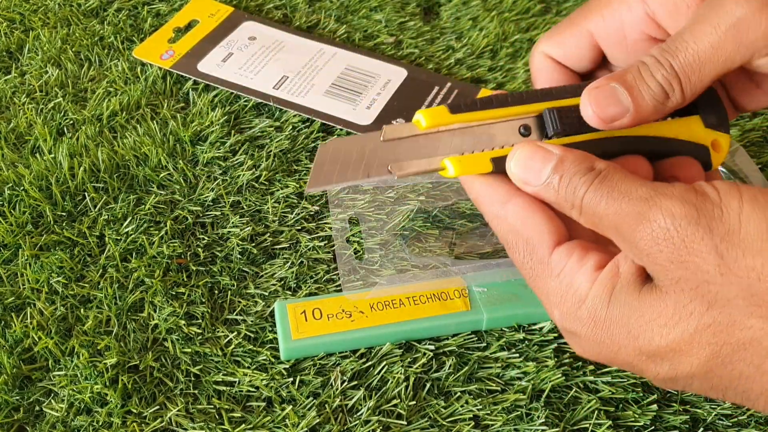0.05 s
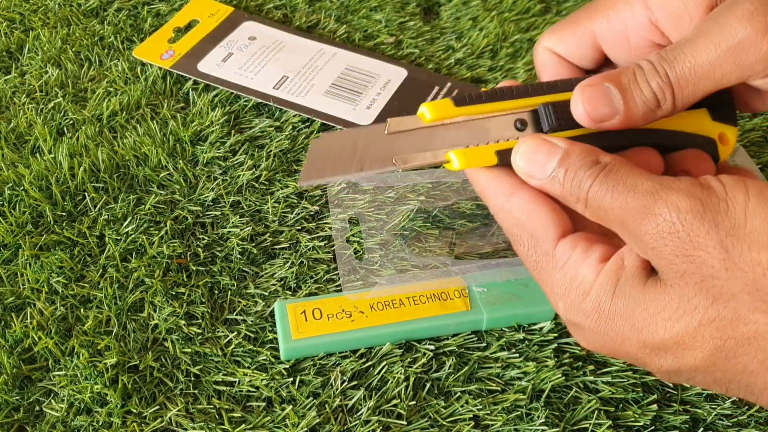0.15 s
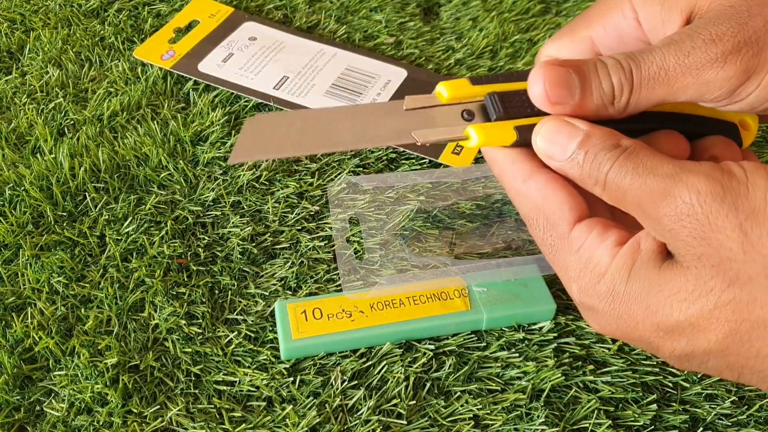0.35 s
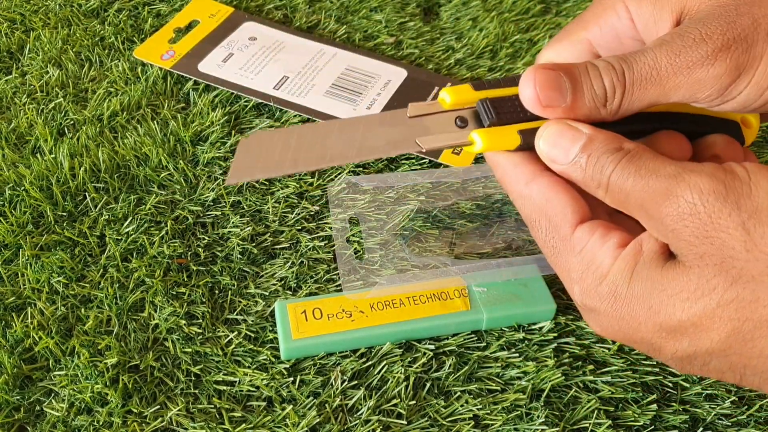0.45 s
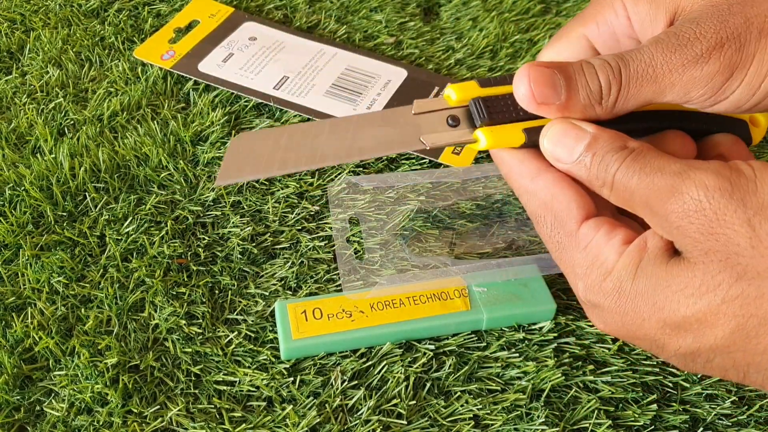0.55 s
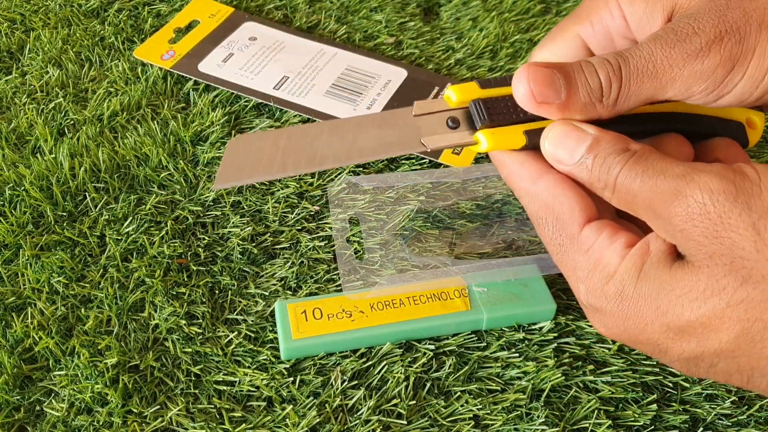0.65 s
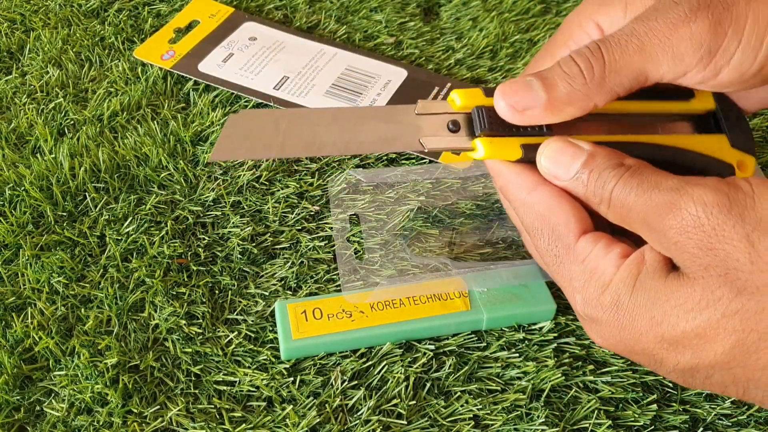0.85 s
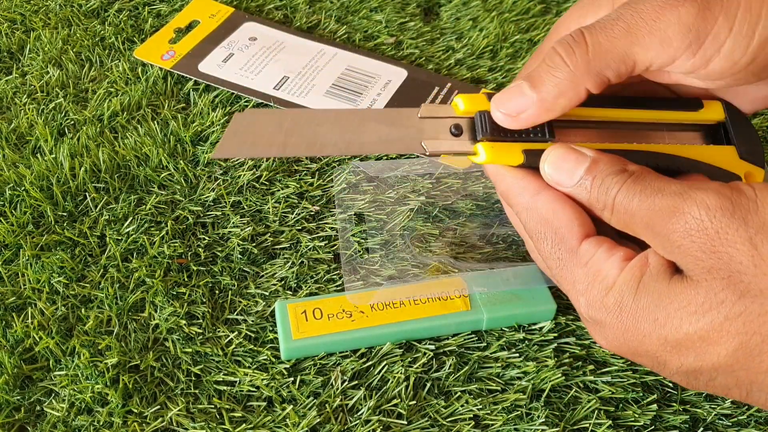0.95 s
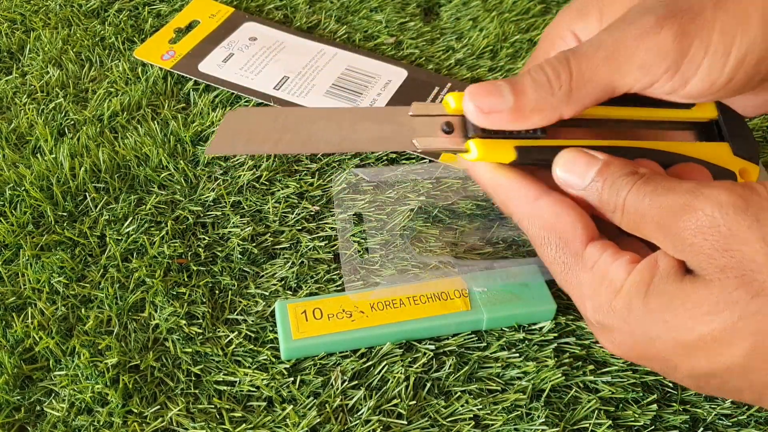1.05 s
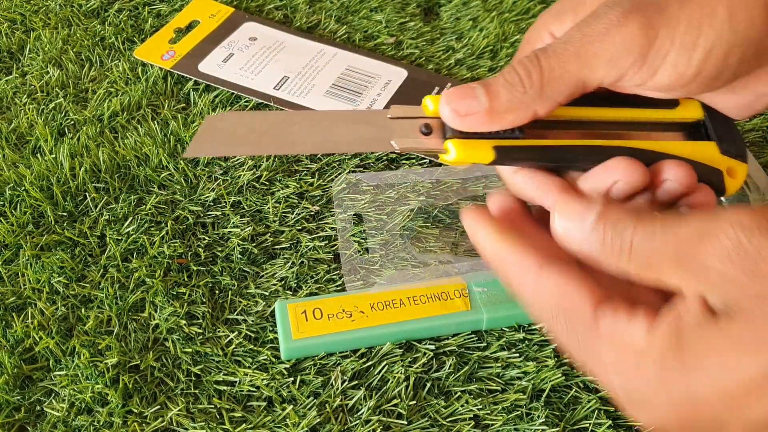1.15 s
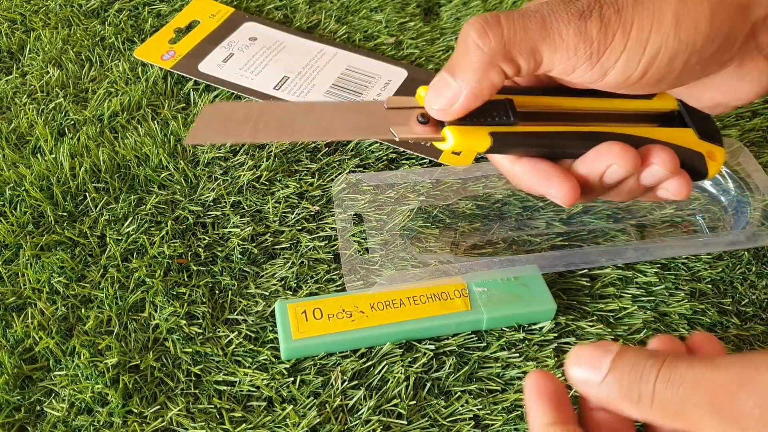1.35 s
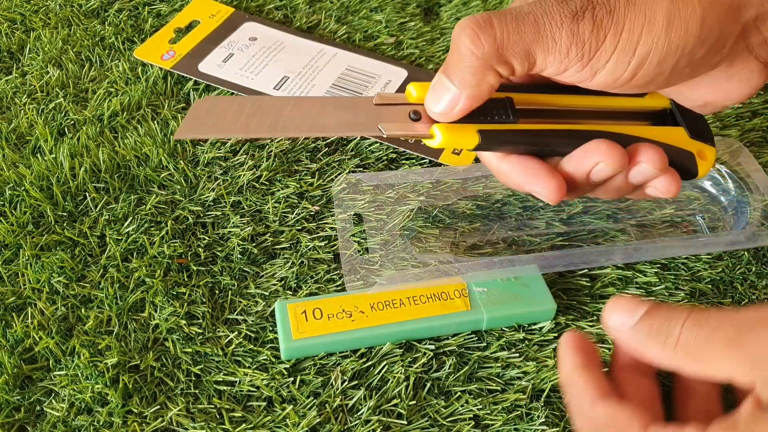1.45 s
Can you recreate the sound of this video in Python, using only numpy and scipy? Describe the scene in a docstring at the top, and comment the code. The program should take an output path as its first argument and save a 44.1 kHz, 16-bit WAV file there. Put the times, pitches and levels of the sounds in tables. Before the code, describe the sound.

A utility knife blade slides out with ten fast, sharp metallic ratchet clicks and a thin steely scrape, after a faint rub; then only slight handling noise over low rumble, close microphone, small room.

```python
"""Utility knife in a small room

A thumb pushes out the blade of a utility knife close to the microphone, in a small room with a low rumble.
Faint rubs and a squeak come first. Then the slider's steel spring snaps over the notches: noise bursts and a
short sine knock the plastic handle, rough decaying tones ring the blade, and grainy noise is its scraping.
Ticks run among the snaps; more rubs, ticks and a squeak follow as the fingers shift their grip.
Low noise and two hum tones lie behind."""
import sys
import numpy as np
from scipy import signal
from scipy.fft import rfft, irfft, next_fast_len
from scipy.io import wavfile
from scipy.ndimage import map_coordinates

SR = 44100
rng = np.random.default_rng(int(sys.argv[2]) if len(sys.argv) > 2 else 0)


def unload_audio(sound):
    """Save the sound as a 16-bit wav file, at the path given as the first command line argument."""
    columns = np.transpose(np.atleast_2d(sound))
    # keep every value between -1 and 1, then stretch to whole-number steps
    steps = np.round(np.clip(columns, -1, 1) * 32767)
    wavfile.write(sys.argv[1], SR, steps.astype(np.int16))


N = 66150  # samples, 1.5 s

# Spring snaps: (time [s], spring pitch [Hz], spring level [dB], slider level [dB], track level [dB],
# handle level [dB], blade ring level [dB], left over right [dB])
SNAPS = [(0.2134, 11250, -23, -29.5, -32.5, -26, -36, -1.5),
         (0.2538, 11850, -22, -33, -31.5, -28.5, -38.5, -1.5),
         (0.281, 12100, -19, -23.5, -30, -32, -41.5, -3),
         (0.2985, 12050, -22.5, -31.5, -34, -36.5, -49, 1.5),
         (0.3103, 12300, -25, -35, -34.5, -38.5, -48, 1),
         (0.3271, 13700, -22.5, -31.5, -29.5, -37.5, -41, -4.5),
         (0.3583, 15000, -20, -28.5, -28, -22, -40.5, -5),
         (.3994, 12450, -20, -31.5, -30, -28.5, -44.5, 0.5),
         (0.4623, 12350, -19, -35, -27.5, -33, -52, 0.5), (0.5699, 12500, -19, -36.5, -32, -28, -44.5, 2)]
# Colours of the struck parts close to the microphone: (frequency [Hz], relative level [dB])
SPRING_COLOUR = [(3000, -52.5), (7000, -28), (8500, -10), (10000, -3.5), (11400, -1.5), (12300, 3.5),
                 (13600, 0.5), (15300, -1.5), (16000, -11), (17000, -29.5)]
SLIDER_COLOUR = [(4000, -36), (6400, -7), (7300, 0.5), (8100, -1.5), (9000, -0.5), (9900, -4.5),
                 (11500, -24), (16000, -40.5)]
TRACK_COLOUR = [(2000, -39), (3200, -10.5), (3900, -2), (4500, -2), (5300, -0.5), (6200, -5), (7500, -16.5),
                (14000, -35.5)]
HANDLE_COLOUR = [(200, -28), (700, -28.5), (1000, -12.5), (1300, -2.5), (1650, 4.5), (2050, -4),
                 (2500, -4.5), (2900, -9), (3300, -3), (3900, -15), (6000, -44)]
SPRING_T60, TRACK_T60, HANDLE_T60 = 0.0064, 0.009, 0.0045  # s, for 60 dB of decay
TWANG_DB = -5  # beside the spring's noise burst
BODY_PAN_DB = -7.5  # left over right
CATCH_LEAD_S = 0.0044  # the spring rides up the tooth before it lets go


def ratchet():
    """Every notch sounds the spring, the slider, the steel track, the handle and the blade."""
    out = np.zeros((2, N))
    for s, spring_hz, spring_db, slider_db, track_db, handle_db, ring_db, pan_db in SNAPS:
        spring = contact(SPRING_COLOUR, SPRING_T60) + amp(TWANG_DB) * twang(spring_hz)
        body = amp(slider_db) * contact(SLIDER_COLOUR, TRACK_T60)
        body = body + amp(track_db) * contact(TRACK_COLOUR, TRACK_T60)
        body = body + amp(handle_db) * contact(HANDLE_COLOUR, HANDLE_T60)
        struck = pan(pan_db) * amp(spring_db) * spring + pan(BODY_PAN_DB) * body
        add(out, s - CATCH_LEAD_S, room(struck))
        add(out, s, amp(ring_db) * blade(s))
    return out


CATCH_S, CATCH_DB = 0.00097, -6.5  # the catch's build-up time constant and peak
RATTLE_DB, RATTLE_T60 = -12, 0.04  # beside the burst; s
SHARED = 0.31  # share of each contact's power that is alike on both sides


def contact(colour, t60):
    """A catch, a sharp burst of chatter and a weak rattle, with the energy of 2 ms at rms 1."""
    t = np.arange(SR // 10) / SR - CATCH_LEAD_S
    catch = amp(CATCH_DB) * np.exp(-abs(t) / CATCH_S)
    burst = fade(t, t60) + amp(RATTLE_DB) * fade(t, RATTLE_T60)
    shape = np.where(t < 0, catch, burst)
    chatter = rng.choice([-1, 1], (3, len(t)))  # one shared row, then left and right
    sides = np.sqrt(SHARED) * chatter[0] + np.sqrt(1 - SHARED) * chatter[1:]
    x = coloured(shape * sides, colour)
    return x / np.linalg.norm(x, axis=1, keepdims=True) * np.sqrt(0.002 * SR)


TWANG_T60 = 0.0092  # s


def twang(hz):
    """The spring's own very short high note, a decaying sine."""
    t = np.maximum(np.arange(SR // 10) / SR - CATCH_LEAD_S, 0)
    return 2 * fade(t, TWANG_T60) * np.sin(2 * np.pi * hz * t)


# Modes of the blade: (frequency [Hz], relative level [dB], decay time at the first snap [s])
BLADE_MODES = [(3860, -17, 0.14), (7100, -11, 0.05), (8940, 5, .26), (9520, -2.5, .14), (11125, 4.5, .22),
               (11200, 1.5, 0.51), (11880, -2.5, 0.14), (12860, 3.5, 0.21), (12900, -1.5, 0.13),
               (15360, -8.5, .2)]
RING_ROUGH, RING_ROUGH_RATE = 1.1, 260  # rattle beside the steady tone; random knots per second
RING_RISE_S, RING_DAMPING_S = 0.0015, 0.5  # swell of the ring; shortening as the blade comes out


def blade(s):
    """The blade's thin ring, roughened by rattling in its track and shorter the further it has slid out."""
    t = np.arange(SR // 10) / SR
    life = np.exp(-(s - SNAPS[0][0]) / RING_DAMPING_S)
    ring = 0
    for hz, db, t60 in BLADE_MODES:
        # complex, so that both strength and phase waver
        rattle = np.array([wobble(RING_ROUGH_RATE, len(t)) + 1j * wobble(RING_ROUGH_RATE, len(t))
                           for _ in range(2)])
        carrier = np.exp(2j * np.pi * (hz * t + rng.random((2, 1))))
        tone = ((1 + RING_ROUGH * rattle) * carrier).real
        ring = ring + amp(db) * fade(t, t60 * life) * unit(tone) / np.sqrt(2)
    swell = 1 - np.exp(-t / RING_RISE_S)
    ending = np.cos(np.pi / 2 * t / t[-1]) ** 2
    return ring * swell * ending


# Blade sliding in its track: (time [s], level [dB])
SCRAPE = [(.175, -72), (.19, -52.5), (.21, -44.5), (.24, -43), (.33, -37.5), (.38, -50), (.42, -53.5),
          (.47, -44.5), (.53, -72), (.56, -63.5), (.61, -42), (.66, -77)]
# Colour of steel sliding on steel, also heard in the grit: (frequency [Hz], relative level [dB])
SCRAPE_COLOUR = [(500, -33), (1500, 2), (2500, 0.5), (4200, -2), (7000, -4), (12000, 1), (15500, 1),
                 (17000, -28.5)]
SCRAPE_PAN_DB, SCRAPE_GRAIN_DB = -20, 1.5  # left over right; depth of the level grain
GRIT_DB = 4  # beside the smooth friction


def scrape():
    """The blade scrapes in its track: sliding noise mixed with small steel catches."""
    sliding = friction(SCRAPE_COLOUR, SCRAPE_GRAIN_DB) + amp(GRIT_DB) * grit()
    return amp(curve(SCRAPE)) * pan(SCRAPE_PAN_DB) * unit(sliding)


GRIT_PER_S, GRIT_SPREAD_DB = 190, 3  # average catches per second; random spread of their levels


def grit():
    """Tiny random catches of steel on steel, rms 1."""
    slips = (rng.random(N) < GRIT_PER_S / SR) * amp(GRIT_SPREAD_DB * rng.standard_normal(N))
    catches = signal.fftconvolve(slips[None], contact(SCRAPE_COLOUR, t60=0.002), axes=1)
    return unit(catches[:, :N])


# Short scuffs of the slider and fingers: (time [s], resonance [Hz], level [dB], decay constant each side [s])
TICKS = [(0.175, 12280, -70, 0.0021), (.229, 4000, -40.5, .002), (.265, 3200, -37, .003),
         (.271, 1620, -41.5, .003), (.285, 7410, -31.5, 0.0023), (.337, 4136, -40, 0.0024),
         (.344, 1600, -43, 0.0022), (.376, 5730, -40.5, .003), (.382, 3990, -35, 0.0035),
         (.433, 2200, -45, .003), (.491, 4300, -43, 0.0026), (0.511, 4200, -48, .002),
         (0.591, 4520, -36, .003), (0.598, 1900, -41.5, .003), (0.618, 4630, -40, 0.0016),
         (1.06, 4144, -74.5, 0.0071), (1.102, 1920, -68, .002), (1.257, 4400, -71.5, 0.0032),
         (1.362, 2120, -60, 0.0075), (1.391, 1960, -63.5, 0.0059), (1.463, 6000, -59, 0.0013)]
# Colour of a scuff: (frequency [Hz], relative level [dB])
TICK_COLOUR = [(600, -30), (1300, -5.5), (1900, -3.5), (3000, -9), (4400, -2), (6000, -11), (12000, -6.5),
               (16000, -20)]
TICK_PAN_DB = -8.5  # left over right
TICK_RING_DB, TICK_RING_T60 = -0.5, 0.008  # beside the plain rasp; s


def ticks():
    """Brief rasps that swell and fade, each exciting one resonance of the knife."""
    out = np.zeros((2, N))
    t = np.arange(SR // 10) / SR
    middle = t[-1] / 2
    for s, hz, db, length in TICKS:
        shape = np.exp(-abs(t - middle) / length)
        rasp = rng.choice([-1, 1], (2, len(t))) * shape
        resonance = fade(t, TICK_RING_T60) * np.sin(2 * np.pi * hz * t)
        ring = signal.fftconvolve(rasp, resonance[None], axes=1)[:, :len(t)]
        scuff = unit(unit(coloured(rasp, TICK_COLOUR)) + amp(TICK_RING_DB) * unit(ring))
        scuff = scuff * np.sqrt(np.mean(shape))  # a longer scuff carries more energy
        add(out, s - middle, room(amp(db) * pan(TICK_PAN_DB) * scuff))
    return out


# Fingers on the handle, before the overall lift: (time [s], level [dB])
RUB = [(.68, -79), (.76, -81), (.82, -109), (.88, -94), (.95, -66.5), (1.01, -84), (1.19, -83),
       (1.255, -69), (1.32, -76.5), (1.362, -65.5), (1.385, -80), (1.45, -76.5), (1.5, -64.5)]
# Colour of the finger rubs: (frequency [Hz], relative level [dB])
RUB_COLOUR = [(500, -11), (1300, 5), (2100, 0), (3000, -8), (4500, 1.5), (7000, 0), (12000, 6),
              (15500, 1.5), (16500, -31)]
RUB_LIFT_DB, RUB_GRAIN_DB = 1, 2  # overall lift; depth of the level grain
# The thumb settles on the slider: (time [s], level [dB])
GRIP = [(0, -65.5), (.06, -69.5), (.12, -65.5), (.17, -63), (.2, -66)]
# Palm on the handle: (time [s], level [dB])
PALM = [(.92, -103), (.975, -67.5), (1.03, -66), (1.08, -72), (1.11, -67.5), (1.15, -70), (1.3, -74.5),
        (1.36, -66.5), (1.41, -69.5), (1.5, -70.5)]
# Duller colour of thumb and palm: (frequency [Hz], relative level [dB])
PALM_COLOUR = [(300, -7.5), (600, 2.5), (1200, 2), (2100, -2), (2600, -7.5), (3200, -22.5), (8000, -39)]


def skin_rubs():
    """Skin on the knife: the thumb rubs at first, fingers and palm after the snaps, all as sliding noise."""
    fingers = amp(curve(RUB) + RUB_LIFT_DB) * friction(RUB_COLOUR, RUB_GRAIN_DB)
    thumb_and_palm = (amp(curve(GRIP)) + amp(curve(PALM))) * friction(PALM_COLOUR, grain_db=3.0)
    return fingers + thumb_and_palm


def friction(colour, grain_db):
    """Sliding noise of rms 1 whose level varies in fine random grain."""
    return unit(coloured(rng.standard_normal((2, N)) * amp(grain_db * wobble(500)), colour))


# Soft bumps of the hands: (time [s], pitch [Hz], level [dB])
BUMPS = [(0.198, 78, -41.5), (0.829, 76, -42), (.86, 65.2, -62)]
BUMP_S = 0.0084  # time from the peak to 1/e


def bumps():
    """Dull swells of a few low cycles as the hands shift."""
    out = 0
    for s, hz, db in BUMPS:
        t = np.arange(N) / SR - s
        out = out + amp(db) * np.exp(-(t / BUMP_S) ** 2) * np.sin(2 * np.pi * hz * t)
    return out


# Faint squeaks: (start time [s], length [s], first pitch [Hz], last pitch [Hz], level [dB])
SQUEAKS = [(0.056, 0.14, 5440, 3300, -69), (1.122, .15, 1420, 1304, -67)]
SQUEAK_WAVER, SQUEAK_FLUTTER_DB = 0.03, 4  # random pitch share; random level depth


def squeaks():
    """Faint, broken whistles: sines that fall and level off, wavering in pitch and level."""
    out = np.zeros((2, N))
    for s, length, first_hz, last_hz, db in SQUEAKS:
        u = np.linspace(0, 1, int(length * SR))
        glide = last_hz + (first_hz - last_hz) * (1 - u) ** 2
        waver = np.array([wobble(907), wobble(867)])[:, :len(u)]
        hz = glide * (1 + SQUEAK_WAVER * waver)
        level = amp(db + SQUEAK_FLUTTER_DB * wobble(150)[:len(u)]) * signal.windows.tukey(len(u), 0.5)
        add(out, s, level * np.sin(2 * np.pi * np.cumsum(hz, axis=1) / SR))
    return out


# Colour of the room's rumble: (frequency [Hz], relative level [dB])
RUMBLE_COLOUR = [(20, -45.5), (31, -23), (42, -1), (52, -1), (92, -5), (120, -16), (155, -23.5), (200, -16),
                 (263, -14.5), (356, -17.5), (500, -26.5), (730, -28.5), (1400, -36.5), (2400, -43),
                 (3100, -49), (7000, -46.5), (16000, -46.5)]
# Further cut towards its hiss: (frequency [Hz], change [dB])
HISS_CUT = [(1000, -1.5), (3000, -6.5), (8000, -10)]
# Likeness of the two channels: (frequency [Hz], correlation [0 to 1])
ALIKE = [(60, .97), (125, 1), (250, 0.67), (500, .1), (4000, 0.05)]
# Balance of the rumble: (frequency [Hz], left over right [dB])
FLOOR_PAN = [(50, 0.5), (130, -2.5), (300, -4), (1000, -4)]
# Hum tones: (frequency [Hz], level [dB])
HUM = [(52, -60.5), (81, -59.5)]
RUMBLE_DB = -50.5  # rms of the noise


def rumble():
    """Room rumble from filtered noise, alike in both channels in the bass, with two wavering hum tones."""
    def mid_side(hz):
        turn = np.arccos(np.clip(along(ALIKE, hz), -1, 1)) / 2
        level = amp(along(RUMBLE_COLOUR, hz) + along(HISS_CUT, hz))
        return level * [np.cos(turn), np.sin(turn)]

    def balance(hz):
        return amp(np.outer([1, -1], along(FLOOR_PAN, hz)) / 2)

    mid, side = filtered(rng.standard_normal((2, N)), mid_side)
    air = unit(filtered(np.array([mid + side, mid - side]), balance))
    t = np.arange(N) / SR
    hum = 0
    for hz, db in HUM:
        level = amp(db + wobble(9))
        hum = hum + level * np.sin(2 * np.pi * hz * t + 2.1 * wobble(7.7))
    return amp(RUMBLE_DB) * air + hum


# Decay of the small room: (frequency [Hz], decay time [s])
ROOM_T60 = [(500, 0.33), (1600, 0.23), (4000, 0.13), (12000, 0.11), (16000, 0.39)]
# Energy of the room's answer beside the direct sound: (frequency [Hz], level [dB])
ROOM_GAIN = [(800, -1.5), (1600, -12.5), (4000, -9), (8000, -10), (12000, -12.5), (16000, -21)]
ROOM_BUILD_S, ROOM_HOLD_S = 0.0018, 0.036  # the answer builds up, then holds until its decay starts


def room(x):
    """The direct sound and the room's short answer, shaped from new noise each time."""
    hz, t, z = signal.stft(rng.standard_normal((2, SR // 3)), SR, nperseg=256)
    decay = fade(t - ROOM_HOLD_S, along(ROOM_T60, hz)[:, None])
    tail = signal.istft(z * decay, SR)[1]
    size = tail.shape[1]
    build = 1 - np.exp(-(np.arange(size) / SR / ROOM_BUILD_S) ** 2)
    tail = unit(tail * build) / np.sqrt(size)
    tail = filtered(tail, lambda f: amp(along(ROOM_GAIN, f)))
    tail[:, 0] += 1  # the direct sound
    return signal.fftconvolve(x, tail, axes=1)


def amp(db):
    """Decibels to amplitude."""
    return 10 ** (np.asarray(db) / 20)


def unit(x):
    """x scaled to rms 1."""
    return x / np.sqrt(np.mean(x ** 2) + 1e-20)


def along(points, hz):
    """Values between (Hz, value) points on a log frequency axis."""
    f, v = np.transpose(points)
    return np.interp(np.log(hz + 1), np.log(f + 1), v)


def curve(rows):
    """One level in dB per sample, falling at 600 dB per second outside the rows."""
    s, db = np.transpose(rows)
    t = np.arange(N) / SR
    outside = abs(t - np.clip(t, s[0], s[-1]))
    return np.interp(t, s, db) - 600 * outside


def wobble(rate, size=N):
    """A smooth random curve, rate knots a second."""
    return map_coordinates(rng.standard_normal(size // 8), [np.arange(size) * rate / SR], mode="wrap")


def pan(db):
    """Left and right gains of constant total power, left over right in dB."""
    return unit(amp(np.array([[db], [-db]]) / 2))


def fade(t, t60):
    """Exponential decay by 60 dB in t60 seconds, level 1 before time zero."""
    return np.exp(-np.log(1000) * np.maximum(t, 0) / t60)


def filtered(x, response):
    """x times a response of frequency."""
    n = x.shape[-1]
    m = next_fast_len(n + SR // 10)
    return irfft(rfft(x, m) * response(np.fft.rfftfreq(m, 1 / SR)), m)[..., :n]


def coloured(x, colour):
    """x through a causal minimum-phase filter of the given colour."""
    n = 2 ** 10
    cepstrum = irfft(np.log(amp(along(colour, np.fft.rfftfreq(n, 1 / SR)))))
    cepstrum[1:n // 2] *= 2  # fold onto positive time
    cepstrum[n // 2:] = 0
    impulse = irfft(np.exp(rfft(cepstrum)))
    return signal.fftconvolve(x, impulse[None], axes=1)[:, :x.shape[1]]


def add(out, s, x):
    """Mix x into out at time s."""
    i = max(round(s * SR), 0)
    out[:, i:i + x.shape[1]] += x[:, :max(N - i, 0)]


def scene():
    """The ratchet close by, the scrape and handling sounds, and the room's rumble behind."""
    return ratchet() + scrape() + ticks() + skin_rubs() + bumps() + squeaks() + rumble()


TOP_HZ = 16600


def record(dry):
    """The recorder cuts steeply above its band limit."""
    return filtered(dry, lambda hz: 1 / (1 + (hz / TOP_HZ) ** 120))


dry = scene()
out = record(dry)
unload_audio(out)
```